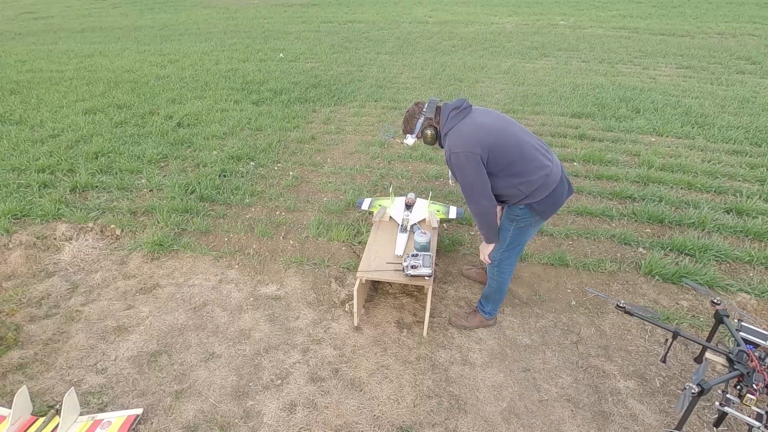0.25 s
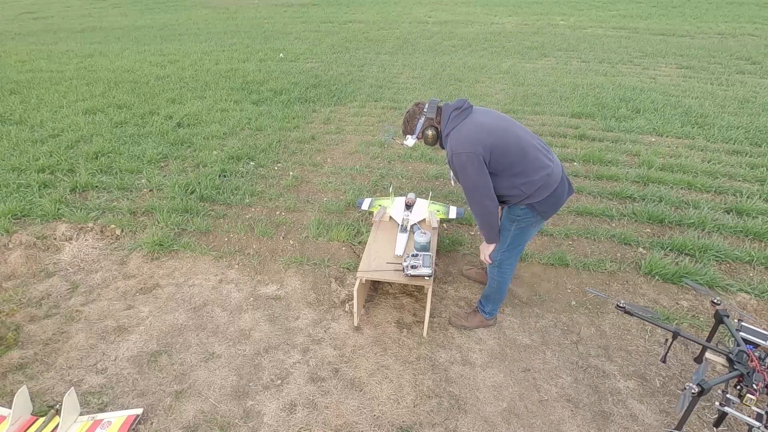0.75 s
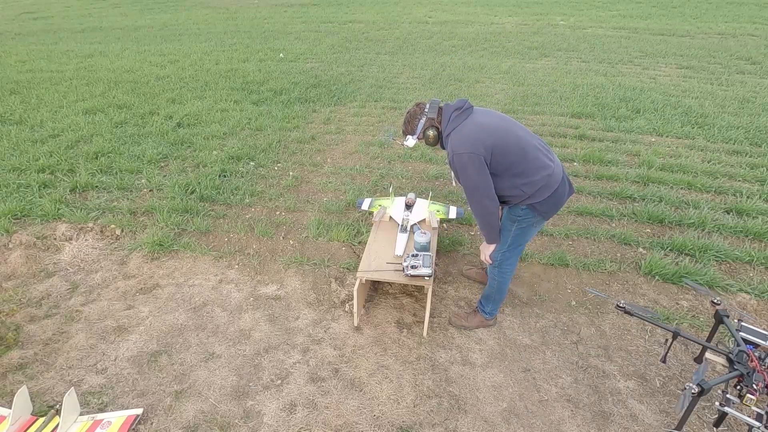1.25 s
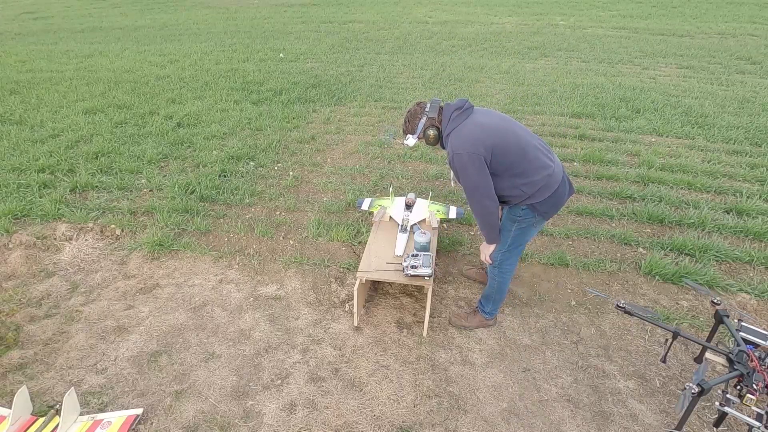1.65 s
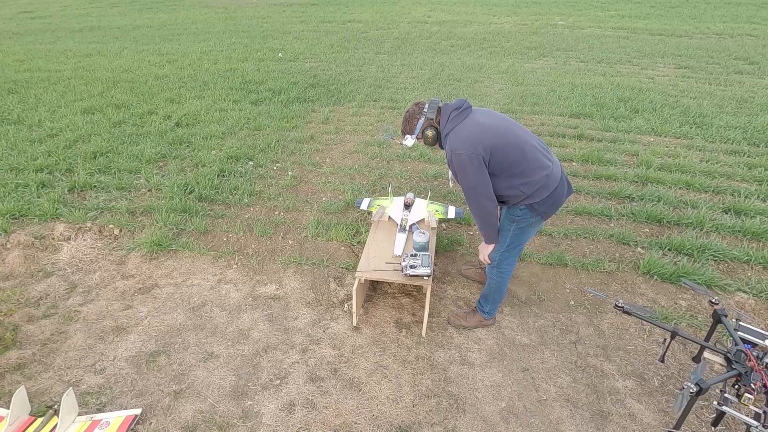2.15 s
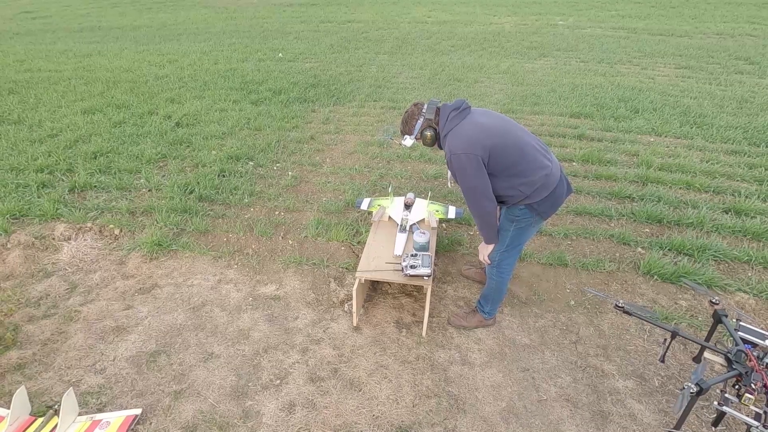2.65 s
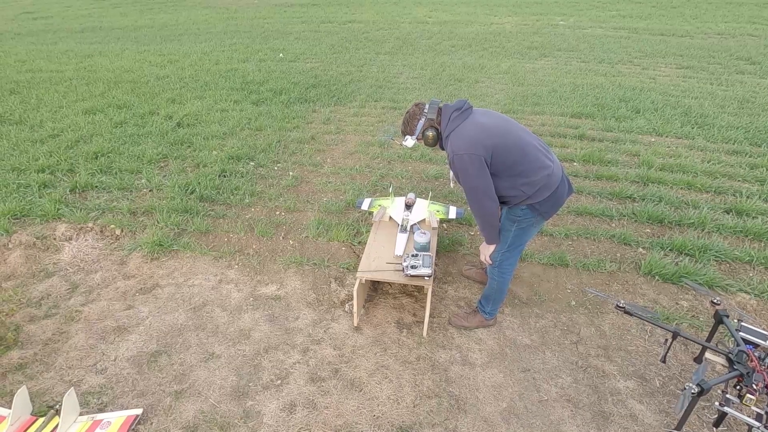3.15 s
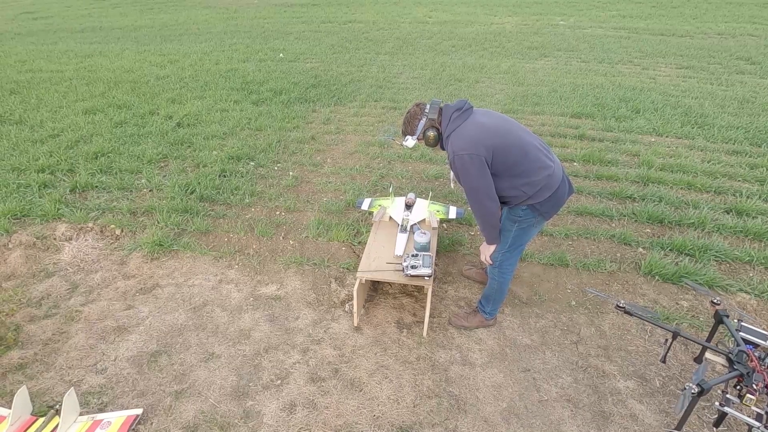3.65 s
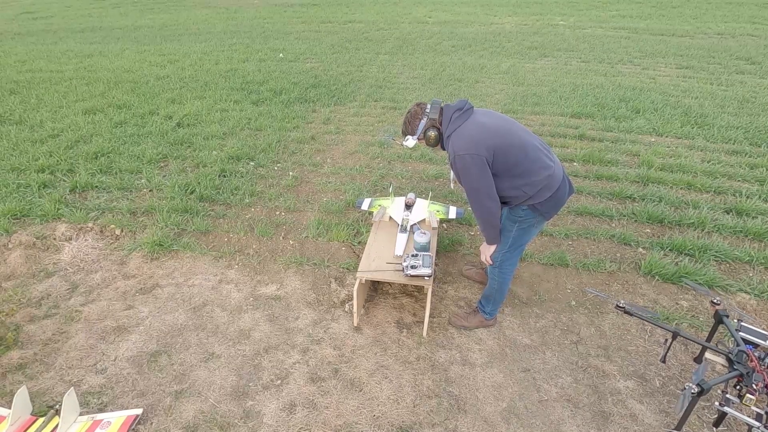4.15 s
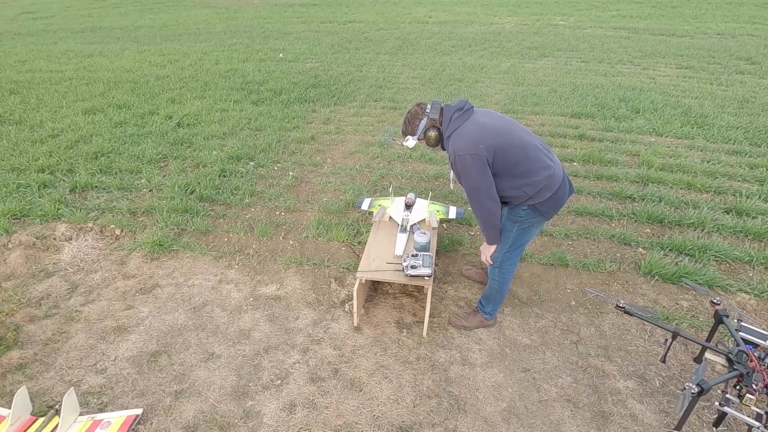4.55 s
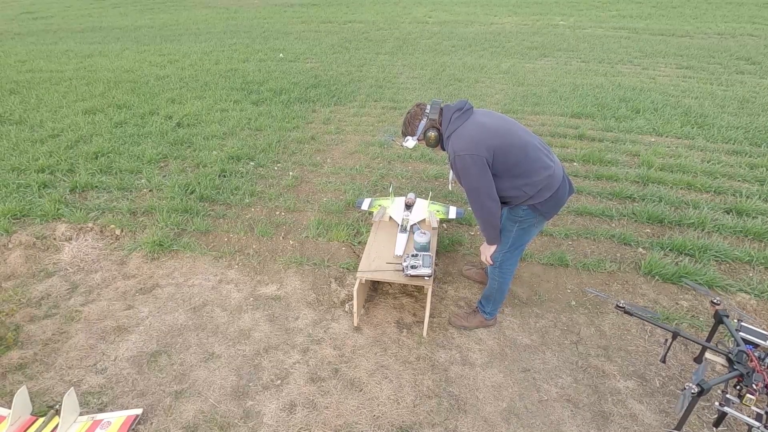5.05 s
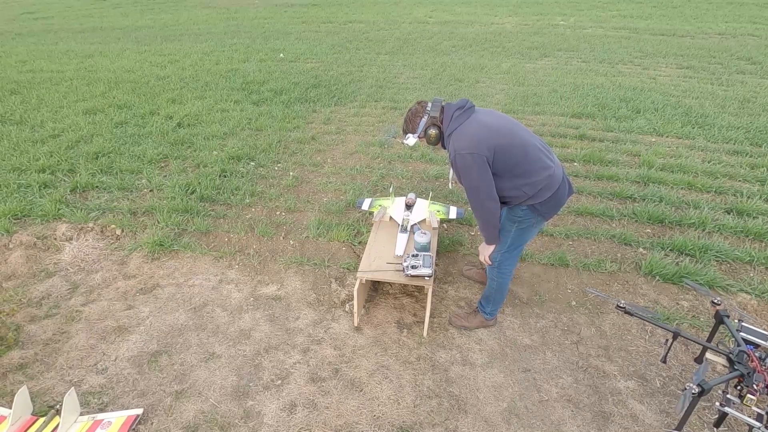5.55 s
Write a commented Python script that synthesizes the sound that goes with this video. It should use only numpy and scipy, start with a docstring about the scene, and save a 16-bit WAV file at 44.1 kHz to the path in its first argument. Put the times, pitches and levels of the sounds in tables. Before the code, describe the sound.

A small jet turbine spools up on a stand in an open field. Its exhaust roars throughout while a high whine climbs in pitch and loudness, joined by a growing intake hiss. A few faint hollow burner notes fade early, and a light breeze buffets the microphone. Near the end the whine almost levels off, and the dry, nearly mono sound spreads into stereo.

```python
"""A small jet turbine on a test stand spools up in an open field.
From the start the exhaust roars, a light breeze buffets the microphone, the compressor blades whine
and the burner sings a few hollow notes. These fade as the whine climbs and the intake hiss grows.
Near four seconds a thin, high whistle falls. Just after five the speed levels off to a slow creep,
and the sound, nearly mono until then, spreads out in stereo."""
import sys
import numpy as np
from scipy import signal
from scipy.fft import rfft, irfft, next_fast_len
from scipy.io import wavfile
from scipy.ndimage import uniform_filter1d

SR = 44100
rng = np.random.default_rng(int(sys.argv[2]) if len(sys.argv) > 2 else 0)


def persist_wave(psi):
    """Save psi, clipped to +-1, as 16-bit WAV."""
    counts = np.round(np.clip(psi, -1, 1) * 32767).astype(np.int16)
    wavfile.write(sys.argv[1], SR, np.atleast_2d(counts).T)


N = 255339
TIME = np.arange(N) / SR


def gain_of(db):
    """Amplitude ratio of a level: tenfold per 20 dB."""
    return 10 ** (np.asarray(db) / 20)


def unit_rms(x):
    """Normalisation to a mean power of one."""
    return x / np.sqrt(np.mean(x ** 2) + 1e-20)


def bell(peak_s, half_s):
    """Gaussian envelope, down to one half at half_s from its peak."""
    return .5 ** (((TIME - peak_s) / half_s) ** 2)


def swell(peak_s, half_s, db):
    """Gaussian envelope that peaks at the given level."""
    return gain_of(db) * bell(peak_s, half_s)


def wander(rate_hz):
    """Random fluctuation: low-passed noise of rms 1."""
    size = next_fast_len(N, True)
    hz = np.fft.rfftfreq(size, 1 / SR)
    spectrum = rfft(rng.standard_normal(size)) / (1 + (hz / rate_hz) ** 4)
    return unit_rms(irfft(spectrum, size)[:N])


def log_interp(points, hz):
    """Interpolation on a logarithmic frequency axis."""
    f, value = np.transpose(points)
    return np.interp(np.log(hz + 1), np.log(f + 1), value)


def band(points, hz, edge_db_per_octave=90):
    """Band-pass spectrum in dB, falling steeply beyond its end points."""
    octaves_outside = abs(np.log2((hz + 1) / (np.clip(hz, points[0][0], points[-1][0]) + 1)))
    return log_interp(points, hz) - edge_db_per_octave * octaves_outside


def resonances(modes, hz):
    """Incoherent addition: the powers of steep-sided modes sum to a level in dB."""
    powers = (gain_of(db) ** 2 / (1 + ((hz - f) / (0.73 * width)) ** 2) ** 2 for f, width, db in modes)
    return 10 * np.log10(sum(powers))


def dips(notches, hz):
    """Destructive interference: the loss in dB where echoes cancel the direct sound."""
    return sum(depth * np.exp(-((hz - f) / width) ** 2) for f, width, depth in notches)


def shelf(hz, spool, corner_hz, tilt_db):
    """High shelf: the level above the corner changes by tilt_db per octave of shaft speed."""
    return tilt_db * spool / (1 + (corner_hz / (hz + 1)) ** 12)


IDLE_HZ, LEVEL_OFF_S, CREEP_HZ_PER_S = 487.2, 5.22, 119
def shaft_hz(t):
    """Rotation frequency: it climbs ever faster from idle, then the fuel control lets it creep on."""
    climb_s = np.minimum(t, LEVEL_OFF_S)
    rise_octaves = .2241 * climb_s + .0038 * climb_s ** 2 + .00098 * climb_s ** 3
    return IDLE_HZ * 2 ** rise_octaves + CREEP_HZ_PER_S * (t - climb_s)


def octaves_above_idle():
    """Logarithmic ratio of shaft speed to idle, at every sample."""
    return np.log2(shaft_hz(TIME) / IDLE_HZ)


def flow_db(peak_db, at_octaves, fall_db):
    """Each flow noise is loudest at one shaft speed and loses fall_db per octave squared either side."""
    return peak_db - fall_db * (octaves_above_idle() - at_octaves) ** 2


# Likeness of the noise at the two microphone ports: (frequency [Hz], coherence [0 to 1])
PORT_COHERENCE = [(30, 0.96), (500, 1), (1500, 1), (3000, 0.99), (5500, 0.89), (7000, .8), (7700, 0.71),
                  (8400, 0.88), (9600, 0.91), (11000, .75), (12200, .5), (12700, .15), (16000, .15)]
# Cancellation by echoes from ground and stand: (frequency [Hz], width [Hz], depth [dB])
ECHO_NOTCHES = [(256, 19, 3.5), (587, 20, 1), (1520, 22, 4.5), (1585, 15, 2.5), (2090, 46, 0.5)]
def turbulence(colour, patchy_db):
    """Partly coherent stereo noise of rms 1, shaped by colour(hz, spool) in dB; eddies make it patchy."""
    frames, hz = N // 512 + 5, np.fft.rfftfreq(2048, 1 / SR)
    speed = shaft_hz(np.linspace(0, N / SR, frames))
    spool = np.log2(speed / speed.mean())[:, None]  # octaves above the mean shaft speed
    left_re, left_im, apart_re, apart_im, eddies = rng.standard_normal((5, frames, len(hz)))
    eddies = uniform_filter1d(eddies, size=6, axis=0)
    eddies = unit_rms(uniform_filter1d(eddies, size=24, axis=1))
    coherence = log_interp(PORT_COHERENCE, hz)
    left = left_re + 1j * left_im
    right = coherence * left + np.sqrt(1 - coherence ** 2) * (apart_re + 1j * apart_im)
    level_db = colour(hz, spool) - dips(ECHO_NOTCHES, hz) + patchy_db * eddies
    spectra = np.array([left, right]) * gain_of(level_db)
    _, noise = signal.istft(spectra.transpose(0, 2, 1), nperseg=2048, noverlap=1536)
    return unit_rms(noise[:, :N])


# Resonances of the exhaust: (frequency [Hz], width [Hz], relative level [dB])
EXHAUST_MODES = [(316, 79, -11), (414, 90, -3.5), (516.7, 74, 0.5), (640, 94, -1), (741, 66, 1),
                 (862, 56, -3), (954.5, 83, -0.5), (1045, 68, -7.5), (1204, 86, -10.5), (1309, 73, -11)]
# Surges and sags of the flame: (time [s], half length [s], change of the roar [dB])
FLAME_SURGES = [(.95, .12, -0.5), (1.227, 0.11, 2.6), (1.56, 0.071, -1.1), (2.9, 0.37, -1.04),
                (3.8, 0.3, 0.9), (4.8, .25, .7)]
# Rush of the fraying jet: (frequency [Hz], relative level [dB])
RUSH_SPECTRUM = [(1300, -14), (1500, -7), (1700, -5.5), (1900, 0.5), (2070, -5), (2300, -3), (2600, -4.5),
                 (3000, -0.3), (3400, -2.5), (3950, -5), (4500, -11), (4950, -10.5), (5400, -16),
                 (6000, -15)]
def exhaust():
    """Combustion and jet noise: the flame rumbles, the hot jet excites modes and frays into a rush."""
    def rumble_colour(hz, spool):
        return resonances([(161.6, 67, -2.5), (98, 32, -12)], hz)

    def roar_colour(hz, spool):
        tilt = shelf(hz, spool, corner_hz=580, tilt_db=-2) + shelf(hz, spool, corner_hz=1100, tilt_db=5.5)
        return resonances(EXHAUST_MODES, hz) + tilt + 1.14 * spool

    def rush_colour(hz, spool):
        tilt = shelf(hz, spool, corner_hz=2380, tilt_db=-2) + shelf(hz, spool, corner_hz=4120, tilt_db=7)
        return band(RUSH_SPECTRUM, hz) + tilt + 0.89 * spool

    rumble = turbulence(rumble_colour, patchy_db=0.4)
    rumble_db = flow_db(peak_db=-36.5, at_octaves=1.0, fall_db=11.5) + wander(rate_hz=9.2)
    roar = turbulence(roar_colour, patchy_db=0.53)
    roar_db = flow_db(peak_db=-23, at_octaves=0.84, fall_db=9.5) + 0.19 * wander(rate_hz=32)
    roar_db += sum(db * bell(peak_s, half_s) for peak_s, half_s, db in FLAME_SURGES)
    rush = turbulence(rush_colour, patchy_db=0.8)
    rush_db = flow_db(peak_db=-30.5, at_octaves=1.082, fall_db=8.8)
    return rumble * gain_of(rumble_db) + roar * gain_of(roar_db) + rush * gain_of(rush_db)


# Wind buffeting: (frequency [Hz], relative level [dB])
WIND_SPECTRUM = [(12, -16), (22, -3), (35, -4), (60, -0.5), (100, -6), (160, -15.5), (230, -17)]
# Gusts of the breeze: (time [s], half length [s], level [dB])
WIND_GUSTS = [(.08, 0.14, -38.5), (0.455, 0.15, -41.5), (1.799, 0.19, -36.5), (2.215, 0.083, -40),
              (2.7, 0.32, -38), (3.3, 0.21, -37.5), (3.85, 0.18, -41), (4.899, .4, -44), (5.47, .25, -39.5)]
def breeze(calm_db=-48):
    """Turbulent pressure fluctuations buffet each port a little differently; gusts add in power."""
    buffeting = turbulence(lambda hz, spool: band(WIND_SPECTRUM, hz), patchy_db=.6)
    antiphase = 0.33 * wander(rate_hz=51) * np.array([[1], [-1]])
    power = gain_of(calm_db) ** 2 + sum(swell(*gust) ** 2 for gust in WIND_GUSTS)
    return (buffeting + antiphase) * np.sqrt(power)


BLADES = 6
# Echo cancellations that the whine sweeps through: (frequency [Hz], width [Hz], depth [dB])
WHINE_NOTCHES = [(2930, 60, 5), (3340, 110, 7.5), (3570, 110, 3), (3830, 150, 5.5), (3940, 60, 11),
                 (4880, 320, 9), (5250, 220, 22), (5955, 55, 18), (6100, 130, 4), (6990, 150, 5.5)]
# Shaft harmonics that flare briefly; 1 and 2 are rotor unbalance, 12 is the octave of the whine:
# (order [multiple of shaft speed], time [s], half length [s], level [dB])
HARMONIC_FLARES = [(1, 4.76, 0.15, -34.5), (1, 5.16, .12, -35.5), (2, 4.63, 0.14, -39), (2, 5, .25, -48),
                   (3, 2.1, .2, -45), (3, 4.96, .2, -42), (3, 5.8, 0.45, -41), (9, 4.15, 0.15, -49),
                   (9, 5.7, .3, -54), (12, 0.19, 0.34, -52.5), (12, 1.43, .2, -49), (12, 1.87, .2, -50.5),
                   (12, 2.8, 0.23, -43.5), (12, 3.31, .13, -50.5), (12, 3.76, .12, -49),
                   (12, 4.13, 0.12, -41.5), (12, 5.18, .2, -50), (15, 1.8, 0.31, -66), (18, 2, .12, -61),
                   (18, 3.38, .08, -65), (21, 1.75, 0.22, -69), (27, .5, .48, -68)]
def rotor(idle_db=-42.3, db_per_octave=15, ceiling_db=-20.8):
    """Harmonics of the rotation, led by the blade-passing whine; inflow turbulence modulates them."""
    speed = shaft_hz(TIME)
    turns = np.cumsum(speed * (1 + 0.00014 * wander(rate_hz=12))) / SR
    shimmer = 0.24 * (speed[0] / speed) ** 1.04  # deepest at low speed

    def tone(order, gain):
        scatter = 1 + shimmer * (wander(rate_hz=43) + 1j * wander(rate_hz=55))
        return np.sqrt(2) * gain * (scatter * np.exp(2j * np.pi * order * turns)).real

    whine_db = np.minimum(idle_db + db_per_octave * octaves_above_idle(), ceiling_db)
    whine_db += 0.63 * wander(rate_hz=8.8) - dips(WHINE_NOTCHES, BLADES * speed)
    flares = {}
    for order, peak_s, half_s, db in HARMONIC_FLARES:
        flares[order] = flares.get(order, 0) + swell(peak_s, half_s, db)
    return tone(BLADES, gain_of(whine_db)) + sum(tone(order, gain) for order, gain in flares.items())


# Burner notes: (starting frequency [Hz], glide [Hz/s], width [Hz], level [dB], start of fade [s])
BURNER_MODES = [(1084, 0.5, 12, -53, .5), (1336, -0.5, 4.9, -44.5, 1.8), (1537, 100.5, 19, -56, 0.88),
                (1816, 109.5, 14, -52, 0.85), (2068, 130, 18, -51, 1.0)]
def burner(fade_db_per_s=7):
    """Narrow resonances driven by the flame: most rise as the gas heats, all die as the flow grows."""
    notes = np.zeros(N)
    for hz, glide, width_hz, db, fade_s in BURNER_MODES:
        drive = wander(width_hz / 2) + 1j * wander(width_hz / 2)
        phase = 2 * np.pi * np.cumsum(hz + glide * TIME) / SR
        note = unit_rms((drive * np.exp(1j * phase)).real)
        notes += note * gain_of(db - fade_db_per_s * np.maximum(TIME - fade_s, 0))
    return notes


# Hiss of the intake: (frequency [Hz], relative level [dB])
HISS_SPECTRUM = [(4600, -17), (5100, -9.5), (5600, -2), (6100, 3.5), (6500, -1), (7100, 1), (7700, -4),
                 (8400, -11)]
# Fizz above the hiss: (frequency [Hz], relative level [dB])
FIZZ_SPECTRUM = [(7300, -21), (7900, -3.5), (8600, 0.5), (9400, -2), (10000, -7.5), (10800, -14),
                 (11600, -20), (12200, -15.5), (13500, -19.5), (15500, -27)]
def intake(idle_db=-50, db_per_octave=12.5, ceiling_db=-34):
    """Broadband noise of air torn by the compressor: brighter with speed, lifted near the blade tones."""
    def hiss_colour(hz, spool):
        blade_hz = BLADES * shaft_hz(TIME).mean() * 2 ** spool
        skirts_db = 4.5 * np.exp(-((hz - blade_hz) / 900) ** 2)
        skirts_db += 3 * np.exp(-((hz - 2 * blade_hz) / 400) ** 2)
        tilt = shelf(hz, spool, corner_hz=6000, tilt_db=4.1)
        return band(HISS_SPECTRUM, hz) + tilt + skirts_db - 1.3 * spool

    def fizz_colour(hz, spool):
        return band(FIZZ_SPECTRUM, hz) + shelf(hz, spool, corner_hz=10400, tilt_db=3.5)

    hiss = turbulence(hiss_colour, patchy_db=1.05)
    hiss_db = np.minimum(idle_db + db_per_octave * octaves_above_idle(), ceiling_db)
    fizz = turbulence(fizz_colour, patchy_db=1.05)
    fizz_db = flow_db(peak_db=-39.5, at_octaves=1.36, fall_db=9.4)
    return hiss * gain_of(hiss_db) + fizz * gain_of(fizz_db)


# Swells of the thin whistle: (time [s], half length [s], level [dB])
WHISTLE_PEAKS = [(3, .4, -68), (3.8, .17, -55)]
def falling_whistle():
    """Frequency mirroring: a pure tone sinks by as much as the octave of the whine climbs."""
    hz = 24000 - 2 * BLADES * shaft_hz(TIME)
    envelope = sum(swell(*peak) for peak in WHISTLE_PEAKS)
    return np.sqrt(2) * envelope * np.sin(2 * np.pi * np.cumsum(hz) / SR)


def scene():
    """Superposition in open air: the sources add without reverberation."""
    fade_in = np.minimum(TIME / .003, 1)
    return fade_in * (exhaust() + breeze() + rotor() + burner() + intake() + falling_whistle())


# Level difference between the ports: (frequency [Hz], left minus right [dB])
PORT_BALANCE = [(2000, 0.5), (4000, 0), (6100, -0.5), (6850, -5), (7300, 8), (8000, 2), (8400, 2),
                (11000, .6), (11350, 5), (11900, -9), (12900, -5), (13800, -8), (16000, -11)]
# Phase difference between the ports: (frequency [Hz], lead of the left [rad])
PORT_PHASE = [(1800, 0), (4000, -0.13), (6000, -2), (7100, -0.34), (7800, -1.5), (8200, 0.5), (8500, 0.64),
              (11000, 1.06), (11600, -2.5), (16000, -1.5)]
# Stereo width below the top treble: (time [s], gain of the side signal [0 to 1])
STEREO_WIDTH = [(0, 0.027), (4.55, 0.0064), (4.8, 0.19), (5.1, 0.34), (5.3, 0.57), (5.79, 1)]
def record(dry, split_hz=10900, cutoff_hz=15800):
    """Band-limited stereo from level and phase differences; below split_hz it is narrow until late."""
    size = next_fast_len(N + SR // 4)
    hz = np.fft.rfftfreq(size, 1 / SR)
    lean = gain_of(log_interp(PORT_BALANCE, hz) / 2) * np.exp(.5j * log_interp(PORT_PHASE, hz))
    ports = np.array([lean, 1 / lean])
    ports /= np.sqrt(np.mean(abs(ports) ** 2, axis=0))  # unit mean power at each frequency
    left, right = rfft(dry, size) * ports
    top = np.clip((hz - split_hz) / 400, 0, 1)
    spectra = np.array([left + right, (left - right) * top, (left - right) * (1 - top)]) / 2
    mid, side_top, side_low = irfft(spectra, size)[:, :N]
    width = np.interp(TIME, *np.transpose(STEREO_WIDTH))
    side = side_top + width * side_low
    lowpass = signal.firwin(511, cutoff_hz, window=("kaiser", 9), fs=SR)
    return signal.oaconvolve(np.array([mid + side, mid - side]), lowpass[None], "same")


dry = scene()
out = record(dry)
persist_wave(out)
```